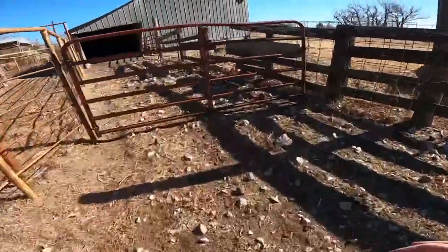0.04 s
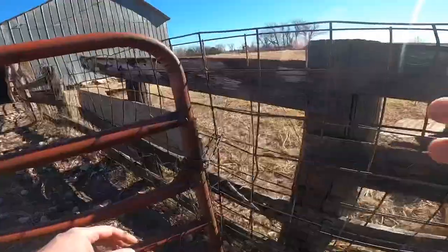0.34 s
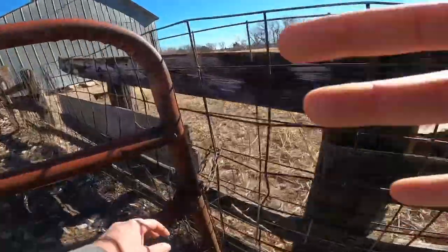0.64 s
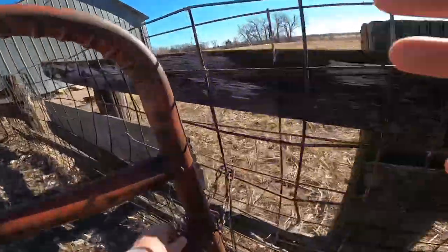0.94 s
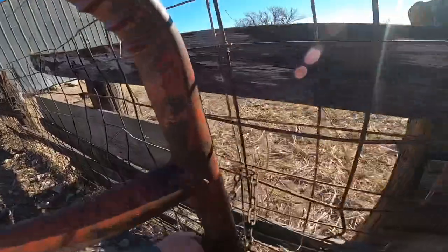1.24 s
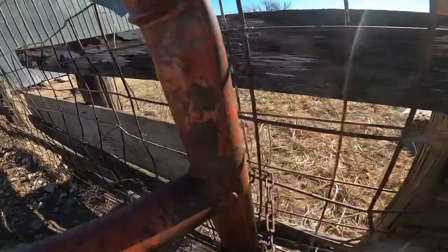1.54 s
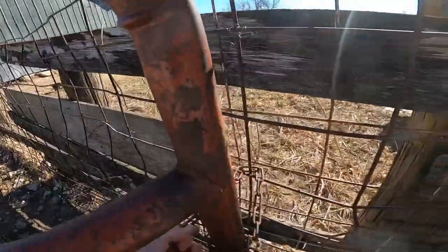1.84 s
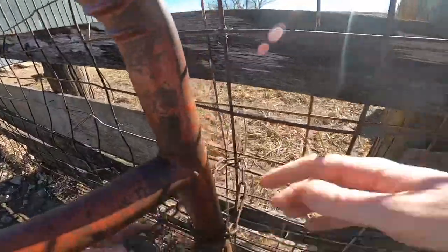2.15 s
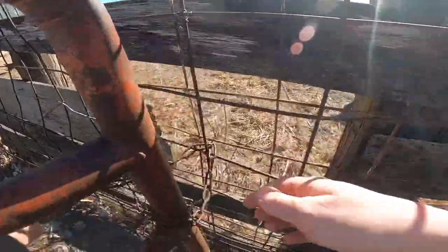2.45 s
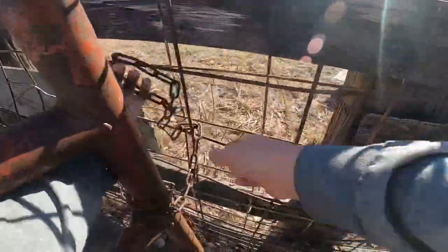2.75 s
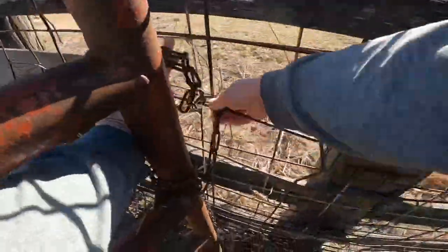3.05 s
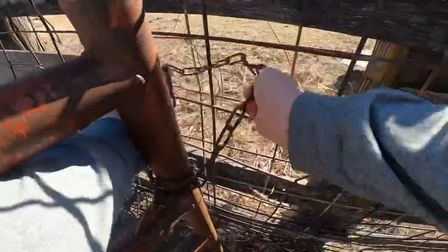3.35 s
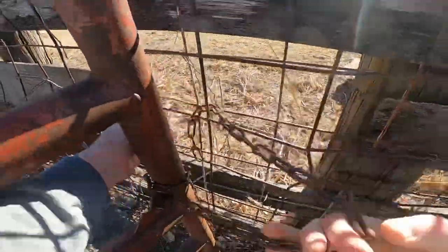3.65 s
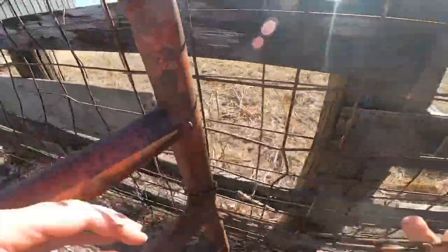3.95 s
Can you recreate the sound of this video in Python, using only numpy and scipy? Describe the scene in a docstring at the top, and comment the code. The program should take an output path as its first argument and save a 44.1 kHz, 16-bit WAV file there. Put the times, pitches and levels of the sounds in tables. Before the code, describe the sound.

A metal chain rattles against a steel tube gate outdoors. After faint scuffs on dirt, the gate bumps a wire fence and rings; then the chain clinks and drags over it, close and slightly left, with light wind.

```python
"""A steel tube gate swings shut against a wire fence in a corral, and its chain is pulled round the post.
The gate knocks and its hollow frame rings long; the chain strikes the wire, drags over the tube and
its links clink very high, all a little left of the microphone. Underneath: light wind on the
microphone, the rustle and scuffs of someone walking up on dry dirt, and a low drone far off."""
import sys
import numpy as np
from scipy import signal
from scipy.fft import rfft, irfft
from scipy.io import wavfile

SR = 44100
rng = np.random.default_rng(int(sys.argv[2]) if len(sys.argv) > 2 else 0)


def bounce(signal):
    """Save signal as a 16-bit WAV file at the path given by the first command-line argument."""
    frames = np.transpose(np.atleast_2d(signal))
    limited = np.clip(frames, -1, 1)
    pcm = np.round(limited * 32767).astype(np.int16)
    wavfile.write(sys.argv[1], SR, pcm)


N = 176400

BLOW_GAIN = np.sqrt(0.03 * SR)  # a blow's level is its energy spread over 30 ms
CRACK_S = 0.00084  # decay of a bare steel-on-steel contact
LEFT_RIGHT = np.array([[1], [-1]])
# how unlike the two channels are, side against mid: frequency_hz, side_db
STEREO_SIDE = [(150, -27), (500, -15.5), (1000, -11.5), (2400, -10.5), (4200, -7.5), (8000, 0.5),
               (13000, -2)]


def gate():
    """The gate bumps the wire fence; two of the bumps, at 1.68 s and 2.2 s, set its whole hollow frame ringing."""
    # gate against fence: start_s, level_db, tilt_db_per_octave, chatter_db
    knocks = [(1.161, -39, -2, 8), (1.409, -31, -1, 10), (1.538, -28.5, 5, -27), (1.615, -31, -3, -27),
              (1.657, -21, 1.5, 11), (1.680, -25.5, -3, 15), (1.786, -34.5, 1, -33), (2.1265, -31, 4.5, 25),
              (2.1627, -20, 6, -2.5), (2.1985, -22.5, 9, 7), (2.237, -21.5, 1.5, 3)]
    # strong resonances of the fence: pitch_hz, relative_db, t60_s
    fence_modes = [(2660, 1, 0.25), (3163, 1.5, 0.49), (3630, -8.5, 0.44), (3714, -10.5, 0.8),
                   (3995, -4, 0.46), (4170, 0.5, 1)]
    # the gate's countless weaker modes: frequency_hz, relative_db
    gate_colour = [(120, -34), (300, -8.5), (600, -4.5), (1100, 1.5), (1550, 6.5), (2100, -2.5), (2700, -2),
                   (4500, 2.5), (5400, -10.5), (6800, -4.5), (8800, -22.5), (15000, -32)]
    # the frame, struck at a different spot by each bump: pitch_hz, first_db, second_db, t60_s
    frame_modes = [(618, -38.5, -40, 2.37), (629, -38.5, -51, 1.9), (695, -39, -45.5, 2.2),
                   (737, -43.5, -47, 2), (806, -44, -40, 1.2), (933, -41, -34, 0.95),
                   (1064, -35, -40, 0.97), (1456, -43, -35, 2.8), (1483, -41.5, -34, 2.26),
                   (1635, -42, -32, 1.26), (1724, -33.5, -42, 1)]
    response = steel_body(fence_modes, gate_colour, modes_db=-13.5, t60=0.85, damping=0.44)
    out = blows(knocks, response, gate_colour, crack_db=-9)
    frame_bumps_s = (1.68, 2.2)
    for hz, *levels, t60 in frame_modes:
        for start, db in zip(frame_bumps_s, levels):
            add(out, start, undb(db) * mode_pair(hz, t60, split=0.00607, twin_db=-6))
    return out


def chain():
    """The chain slaps the wire and drags, link by link, over the hollow tube."""
    # chain against wire: start_s, level_db, tilt_db_per_octave, chatter_db
    strikes = [(1.538, -24, -6.5, 14), (2.6922, -19.5, -6.5, 0.5), (2.756, -29, 0.5, -14),
               (2.835, -35.5, -1, -4), (3.0434, -34.5, -1.5, -12), (3.2275, -38.5, -3, -17),
               (3.2946, -22, -4, -1.5), (3.3478, -25.5, -2, -2), (3.4073, -22, -9, 1), (3.5, -36.5, 1, -1),
               (3.6022, -21, 0, 4), (3.638, -22.5, 0.5, 5), (3.6745, -20.5, -2.5, -1),
               (3.7319, -26.5, 2.5, 4), (3.7583, -25.5, -4.5, 7), (3.9035, -26.5, -8.5, -1),
               (3.9239, -25.5, 3, 0), (3.952, -27, -3, -2)]
    # strength of the drag: time_s, tube_ring_db, scrape_db
    drag = [(2.72, -65, -55), (2.758, -38, -41), (2.768, -19.5, -32.5), (2.80, -30.5, -32.5),
            (2.925, -29.5, -39), (2.942, -79, -74), (2.962, -32.5, -42), (3.05, -36.5, -44.5),
            (3.20, -43, -53), (3.25, -33.5, -38), (3.34, -43.5, -52), (3.362, -29.5, -55), (3.42, -35, -58),
            (3.48, -34.5, -48.5), (3.595, -36, -40), (3.63, -24, -41), (3.80, -29.5, -35),
            (3.89, -30, -41.5), (4.0, -31.5, -27.5)]
    # strong resonances of wire and tube: pitch_hz, relative_db, t60_s
    wire_modes = [(3620, 7, 0.071), (3600, -6, 0.27), (4590, 6, 0.082), (4660, 10, 0.12), (5050, 5, .12),
                  (6000, 8, 0.15), (8100, 15, 0.1)]
    tube_modes = [(502, -8, 0.41), (886, -1, 0.064), (912.8, -2.5, 0.19), (1066, -10, 0.056),
                  (1219, -10, 0.14)]
    # their countless weaker modes: frequency_hz, relative_db
    wire_colour = [(200, -72), (600, -22), (1500, -3.5), (3000, -2.5), (3500, 6), (4100, 2.5), (4700, 4.5),
                   (6200, 7), (7100, 2), (7800, 2.5), (8700, -8), (12500, -9), (15500, -16.5)]
    tube_colour = [(150, -15.5), (380, -7.5), (490, 4), (620, 4.5), (780, -1), (930, 4), (1350, -0.5),
                   (1800, -7.5), (2500, -51)]
    wire = steel_body(wire_modes, wire_colour, modes_db=-9.5, t60=0.59, damping=0.55)
    tube = steel_body(tube_modes, tube_colour, modes_db=-2.5, t60=0.2, damping=0.73)
    contacts = unit_rms(clicks(N, per_s=330))
    tube_ring = undb(-0.5) * excite(contacts * envelope(drag, column=1), tube)
    scrape = contacts * envelope(drag, column=2)
    ticks = undb(-4) * excite(scrape, burst(wire_colour, CRACK_S))
    return blows(strikes, wire, wire_colour, crack_db=-12) + tube_ring + excite(scrape, wire) + ticks


def pings():
    """Struck wire and tube sing briefly, each time a rough pair of notes."""
    # short notes: start_s, pitch_hz, peak_db, t60_s
    notes = [(1.161, 3630, -35.5, 0.31), (1.396, 3714, -35, 0.65), (2.162, 4770, -13, 0.05),
             (2.175, 2700, -18, 0.16), (2.1982, 5800, -12, 0.17), (2.199, 1436, -20, 0.12),
             (2.1985, 6370, -14.5, 0.23), (2.292, 4090, -23, 0.15), (2.39, 4110, -30, 0.42),
             (2.693, 4580, -18.5, 0.18), (2.767, 915, -20, .24), (3.2954, 4490, -14.5, 0.075),
             (3.358, 899, -23.5, 0.23)]
    out = np.zeros((2, N))
    for start, hz, db, t60 in notes:
        add(out, start, undb(db) * mode_pair(hz, t60, split=0.023, twin_db=-1))
    return out


def links():
    """Small links tick and jingle against each other, each a little different in pitch."""
    # link against link: start_s, level_db, jingle_length_s
    clinks = [(1.75, -36.5, 0.047), (1.986, -42, 0.017), (2.045, -42.5, 0.004), (2.058, -42, 0.0022),
              (2.078, -38.5, 0.0024), (2.1, -39, 0.0084), (2.153, -29.5, 0.088), (2.3212, -40, 0.019),
              (2.388, -43, 0.0048), (2.5474, -45, 0.01), (2.695, -32.5, 0.038), (2.7584, -30, 0.07),
              (2.8208, -31, 0.023), (2.834, -24.5, 0.072), (2.9647, -39.5, 0.023), (2.988, -32.5, .015),
              (3.0047, -23, 0.018), (3.022, -26, 0.019), (3.056, -36, 0.089), (3.156, -34, 0.053),
              (3.6013, -31.5, 0.045), (3.6334, -28.5, 0.089), (3.732, -39, 0.06), (3.923, -27, 0.0034)]
    # resonances of one link: pitch_hz, relative_db, t60_s
    link_modes = [(11392, 8.7, 0.12), (11600, 3.7, 0.02), (12270, 3.7, 0.039), (12770, 2.2, 0.14)]
    # shimmer of its weaker modes: frequency_hz, relative_db
    link_colour = [(10700, -14), (11500, 7), (12500, 2), (13300, -6), (15000, -54)]
    shimmer_s, loose_from_s = 0.019, 1.88
    out, t = np.zeros((2, N)), np.arange(SR // 4) / SR
    for start, db, length in clinks:
        rebounds = unit_energy(clicks(len(t), per_s=770) * np.exp(-(t / length) ** 2))
        force = unit_energy((t == 0) + rebounds)
        detune = 1 + 0.0011 * rng.standard_normal()
        link = ring([(hz * detune, level, t60) for hz, level, t60 in link_modes], len(t))
        link += undb(-8) * burst(link_colour, shimmer_s)
        jingle = unit_energy(excite(force, link)[:, :len(t)])
        tick = undb(-17.5) * burst([(1500, -15), (4500, 15), (15000, -17)], decay_s=0.0024)
        add(out, start, undb(db) * BLOW_GAIN * (jingle + tick))
    # the held chain never hangs quite still
    loose = unit_rms(clicks(N, per_s=60)) * (np.arange(N) / SR > loose_from_s)
    return out + undb(-52.5) * excite(loose, burst(link_colour, shimmer_s))


def walker():
    """Someone walks up: clothes and grit rustle, and feet scuff the dry dirt."""
    # scuffs and bumps on the dirt: start_s, level_db, centre_hz, decay_s
    scuffs = [(0.156, -32, 117, 0.0082), (0.2776, -35.5, 540, 0.003), (0.332, -39.5, 131, 0.0086),
              (.604, -51, 2120, 0.0027), (0.606, -45, 255, 0.009), (0.686, -33, 86.6, 0.021),
              (1.009, -48.5, 4370, 0.013), (2.602, -42.5, 204, 0.042)]
    # rustle of clothes and dirt: time_s, level_db
    rustle_level = [(0, -58), (.33, -53), (.36, -83), (.54, -67), (.6, -55), (.81, -52), (.87, -62.5),
                    (1.03, -46), (1.1, -54.5), (2, -55)]
    # its spectrum: frequency_hz, relative_db
    rustle_colour = [(200, -34), (500, 15), (1400, 0), (2500, 1), (4500, -3.5), (7000, -9), (8500, -32),
                     (15000, -26)]
    grit = unit_rms(excite(clicks(N, per_s=900), burst(rustle_colour, decay_s=0.0039)))
    out = envelope(rustle_level) * unit_rms(grit + noise(rustle_colour, N))
    for start, db, centre, decay in scuffs:
        colour = [(centre / 6, -20), (centre / 3.6, 0), (centre * 1.37, 0),
                  (centre * 3, -26), (centre * 10, -60)]
        soften = signal.butter(2, min(centre * 2, 9000), fs=SR, output="sos")
        add(out, start, undb(db) * BLOW_GAIN * signal.sosfilt(soften, burst(colour, decay)))
    return out


def wind():
    """Light wind rumbles on the microphone; a small share hits each port on its own."""
    # gusts: time_s, level_db
    gusts = [(0, -30.5), (.06, -28), (.12, -37), (.27, -34), (.36, -49.5), (.6, -45), (1.3, -46),
             (3.5, -47.5), (3.8, -36.5), (4, -40)]
    # spectrum of the rumble: frequency_hz, relative_db
    wind_colour = [(20, 0), (60, 4.5), (120, 1), (180, -10.5), (300, -13), (800, -66)]
    common = noise(wind_colour, N)
    apart = undb(-13) * noise(wind_colour, N) * LEFT_RIGHT
    return envelope(gusts) * (common + apart)


def distance():
    """Open air round the corral and a far, low drone, a narrow band of noise."""
    # hush of the open air: frequency_hz, relative_db
    air_colour = [(60, -15), (200, -14), (400, 11), (700, 1), (1200, 7.5), (2000, -5.5), (3200, -26),
                  (15000, -41.5)]
    drone_hz, half_width_hz = 83.5, 4
    band = 1 / (1 + ((np.fft.rfftfreq(N, 1 / SR) - drone_hz) / half_width_hz) ** 2)
    drone = unit_rms(irfft(rfft(rng.standard_normal(N)) * band, N))
    return undb(-53) * noise(air_colour, N) + undb(-48) * drone


def blows(hits, response, colour, crack_db):
    """Each blow is a push and dying rebounds; harder contact is brighter, and a clean one cracks."""
    size = SR // 4
    t, hz = np.arange(size) / SR, np.fft.rfftfreq(size, 1 / SR)
    octave = np.log2(np.clip(hz, 500, 9000) / 3000)
    rattle_s, chatter_s = 0.16, 0.012  # loose wire rattles on after the quick rebounds
    push, cracks = np.zeros(N), np.zeros((2, N))
    for start, db, tilt_db, chatter_db in hits:
        rattle = undb(-20.5) * unit_energy(clicks(size, per_s=120) * np.exp(-t / rattle_s))
        chatter = undb(chatter_db) * unit_energy(clicks(size, per_s=450) * np.exp(-t / chatter_s))
        force = unit_energy((t == 0) + rattle + chatter)
        # a minimum-phase tilt keeps the attack sharp
        cepstrum = irfft(np.log(undb(tilt_db * octave)), size) * (1 + np.sign(t)) * (t < t[-1] / 2)
        strength = undb(db) * BLOW_GAIN
        add(push, start, strength * irfft(rfft(force) * np.exp(rfft(cepstrum)), size))
        crack_gain = undb(crack_db) / np.hypot(1, undb(chatter_db))
        add(cracks, start, strength * crack_gain * burst(colour, CRACK_S))
    return excite(push, response) + cracks


def steel_body(modes, colour, modes_db, t60, damping):
    """Response of a steel part: single modes and a dense field (t60 at 1 kHz) whose highs die first."""
    size = SR * 2
    t = np.arange(size) / SR
    octave = np.log2(np.fft.rfftfreq(size, 1 / SR) / 1000 + 1e-6)
    spectrum, field = rfft(noise(colour, size)), 0
    for k in range(-3, 5):
        band = irfft(spectrum * np.maximum(1 - abs(octave - k), 0))
        band_t60 = t60 / 2 ** (k * damping)
        field = field + band * ring_down(t, band_t60) / np.sqrt(band_t60)
    return unit_energy(unit_energy(field) + undb(modes_db) * ring(modes, size))


def mode_pair(hz, t60, split, twin_db):
    """Bent steel rings in close pairs: a note and its slightly higher twin beat together, peak 1."""
    note = ring([(hz, 0, t60), (hz * (1 + split), twin_db, t60)], int(SR * t60))
    return note / abs(note).max()


def ring(modes, size):
    """Decaying sines; higher ones reach the two channels more out of step."""
    t, out = np.arange(size) / SR, 0
    for hz, db, t60 in modes:
        spread = np.arctan(min(gain_at(hz, STEREO_SIDE), 1))
        phase = rng.uniform(0, 2 * np.pi) + LEFT_RIGHT * rng.choice([-1, 1]) * spread
        out = out + undb(db) * unit_energy(np.sin(2 * np.pi * hz * t + phase) * ring_down(t, t60))
    return unit_energy(out)


def ring_down(t, t60, rise_s=0.00041):
    """Steel takes a moment to start ringing, then falls 60 dB in t60 seconds."""
    return (1 - np.exp(-t / rise_s)) * np.exp(-np.log(1000) * t / t60)


def clicks(size, per_s):
    """Random contacts of random strength."""
    return (rng.random(size) < per_s / SR) * rng.standard_normal(size)


def burst(colour, decay_s):
    """A short dying burst of noise, unit energy."""
    t = np.arange(SR // 4) / SR
    return unit_energy(noise(colour, len(t)) * np.exp(-t / decay_s))


def noise(colour, size):
    """Coloured stereo noise, alike in the bass and unlike in the treble."""
    hz = np.fft.rfftfreq(size, 1 / SR)
    mid, side = rfft(rng.standard_normal((2, size)))
    width = np.minimum(gain_at(hz, STEREO_SIDE), 1)
    stereo = (mid + LEFT_RIGHT * width * side) / np.sqrt(1 + width ** 2)
    return unit_rms(irfft(stereo * gain_at(hz, colour), size))


def excite(force, response):
    """A force played through a stereo response."""
    return signal.fftconvolve(force[None], response, axes=1)[:, :N]


def envelope(table, column=1):
    """Gain over time from one dB column; silent before its first row."""
    rows, t = np.array(table), np.arange(N) / SR
    return undb(np.interp(t, rows[:, 0], rows[:, column])) * (t >= rows[0, 0])


def gain_at(hz, points):
    """Gain of a (Hz, dB) table at given frequencies."""
    rows = np.array(points)
    return undb(np.interp(np.log(hz + 1), np.log(rows[:, 0]), rows[:, 1]))


def add(out, start_s, x):
    """Mix a sound in at a time."""
    i = max(int(start_s * SR), 0)
    part = x[..., :max(N - i, 0)]
    out[..., i:i + part.shape[-1]] += part


def undb(db):
    """Decibels to gain."""
    return 10 ** (np.asarray(db) / 20)


def unit_energy(x):
    """Scale to a mean energy of 1 per channel."""
    return x / np.sqrt(np.mean(np.sum(x ** 2, axis=-1)) + 1e-18)


def unit_rms(x):
    """Scale to rms 1."""
    return x / np.std(x)


def scene():
    """The metal, slightly to the left and carrying no bass, over the sounds of the corral."""
    low_cut_hz, left_db = 215, 1.5
    thin = signal.butter(2, low_cut_hz, "high", fs=SR, output="sos")
    metal = signal.sosfilt(thin, gate() + chain() + pings() + links())
    return metal * undb(LEFT_RIGHT * left_db / 2) + walker() + wind() + distance()


def record(dry):
    """The image is mono at first and then opens to stereo; the camera cuts the highest treble."""
    opening_s, top_hz = (0.87, 1.7), 15900
    mid = dry.mean(axis=0)
    width = np.interp(np.arange(N) / SR, opening_s, (0, 1))
    top_cut = signal.ellip(8, .2, 70, top_hz, fs=SR, output="sos")
    return signal.sosfilt(top_cut, mid + width * (dry - mid))


dry = scene()
out = record(dry)
bounce(out)
```